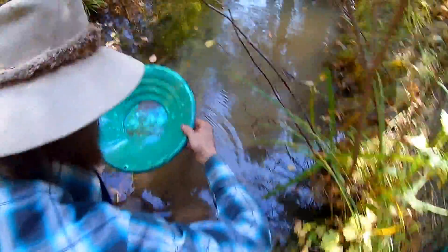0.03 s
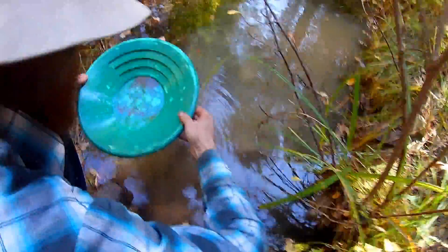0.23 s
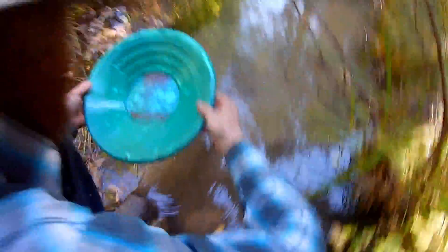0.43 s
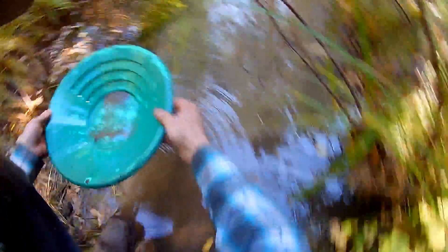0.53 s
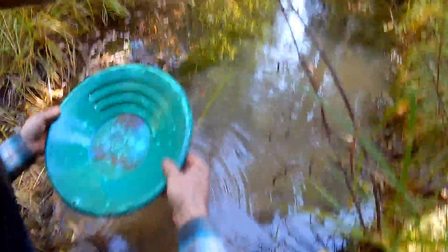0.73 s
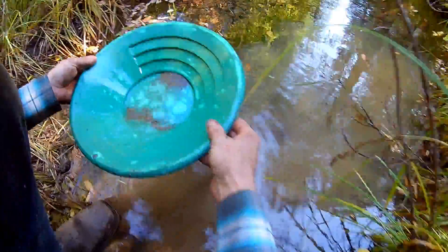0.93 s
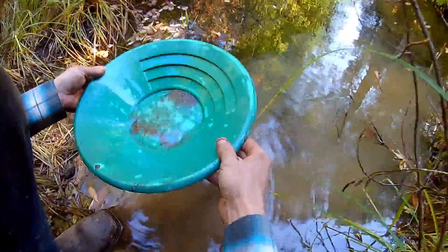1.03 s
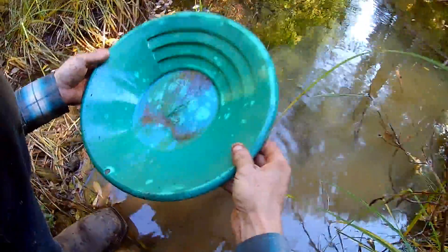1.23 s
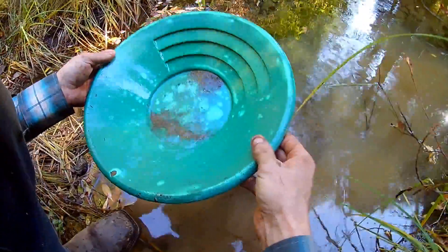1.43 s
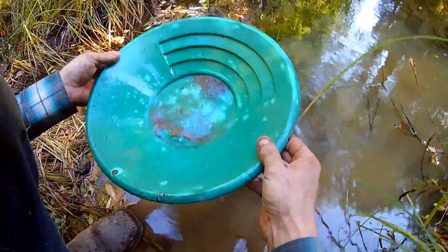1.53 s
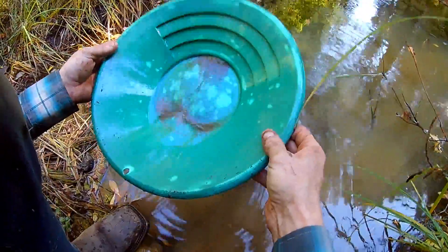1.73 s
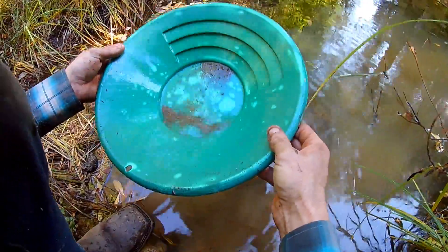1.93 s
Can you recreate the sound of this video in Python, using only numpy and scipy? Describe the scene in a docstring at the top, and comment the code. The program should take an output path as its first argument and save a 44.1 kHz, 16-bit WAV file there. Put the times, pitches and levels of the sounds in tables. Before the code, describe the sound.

Hollow knocks on a handled plastic gold pan, followed by small drips over soft creek water.

```python
"""A sleeve rustles close by, then a hollow plastic gold pan is bumped and knocked for about a second.
Soft bumps boom in its body, hard knocks clack and ring its wall, and sliding fingers make it buzz.
Then the pan is held still. Scattered drops, each a small ringing bubble, plink into the water
over the soft wash of a slow, muddy creek."""
import sys
import numpy as np
from scipy import signal
from scipy.fft import rfft, irfft
from scipy.io import wavfile

SR = 44100
rng = np.random.default_rng(int(sys.argv[2]) if len(sys.argv) > 2 else 0)


def put_to_file(sound):
    """Save the sound as 16-bit audio at rate SR, in the file named by the first command-line argument."""
    columns = np.atleast_2d(sound).T  # one column per channel
    safe = np.clip(columns, -1, 1)
    whole_steps = np.round(safe * 32767)
    wavfile.write(sys.argv[1], SR, whole_steps.astype(np.int16))


N = 88200
TIME = np.arange(N) / SR


# hard hits on the pan; tick and wall levels are relative to the clack:
# start_s, level_db, clack_hz, band_edge_ratio, tick_db, tick_top_hz, wall_db, wall_hz
HARD_KNOCKS = [(.3690, -20.5, 1265, 1.25, -6.5, 11700, -17, 672),
               (.3835, -49, 840, 1.25, -8, 4000, -13, 679), (.446, -41, 1550, 1.3, -15, 8000, -23, 709),
               (.485, -46.5, 2040, 1.15, -9, 8000, -25, 715), (0.6842, -39, 1330, 1.23, -4, 3020, -17, 643),
               (0.6959, -33.5, 1990, 1.63, -3, 8700, -22, 640),
               (0.7085, -34, 1620, 1.22, -13, 5000, -24, 616), (.7160, -41, 1480, 1.2, -15, 6500, -32, 610),
               (0.7252, -51, 1450, 1.4, -15, 5000, -23, 630), (.7400, -58, 1710, 0.92, -5, 6000, -10, 630),
               (0.7524, -36.5, 1190, 1.17, -6, 5200, -12.5, 626),
               (.8870, -36.5, 1475, 1.21, -2.5, 5700, -21, 766),
               (.9595, -53.5, 1370, 1.46, -24, 3600, -16, 640)]
# the wall's main note, a beating cluster: pitch_ratio, level_db, t60_s
WALL_CLUSTER = [(0.939, -4.5, 0.088), (1.009, 1.5, 0.12), (1.077, -5.5, 0.18)]
# the wall's higher modes: pitch_hz, level_db, t60_s
WALL_OVERTONES = [(1160, -15, 0.04), (1362, -6, 0.056), (1692, -7.5, 0.067), (2120, -17, 0.08),
                  (2832, -16.5, 0.11), (3510, -25, 0.33), (3810, -41, 0.11)]
# the bright tick on the attack: pitch_hz, level_db, t60_s
TICK_MODES = [(2780, 8, 0.0028), (3936, -0.5, 0.013), (5380, -0.5, 0.013), (5740, 0.5, 0.0073),
              (6870, -2.5, .005), (7460, 8.5, 0.0034), (13400, 6, 0.0017)]
GRIT_DB, GRIT_T60_S = -31, 0.095   # sand crushed in the contact, relative to the first click

def pan_knocks():
    """A hard contact gives a short clack, a bright gritty tick and a faint ring of the wall."""
    out, t = np.zeros(N), TIME[:N // 5]
    click = (t == 0) + 1e-18
    for start, db, clack_hz, edge_ratio, tick_db, tick_top_hz, wall_db, wall_hz in HARD_KNOCKS:
        edge_ratio = np.clip(edge_ratio, 1.1, 2)
        clack = filtered(click, 3, [clack_hz / edge_ratio, clack_hz * edge_ratio], "band")
        grit = click + rng.standard_normal(len(t)) * from_db(GRIT_DB - 60 * t / GRIT_T60_S)
        tick = signal.fftconvolve(grit, ring(TICK_MODES, t))[:len(t)]
        tick = filtered(tick, 4, tick_top_hz, "low")
        cluster = [(wall_hz * ratio, level, t60) for ratio, level, t60 in WALL_CLUSTER]
        overtones = [(hz, level + rng.normal(0, 2.6), t60) for hz, level, t60 in WALL_OVERTONES]
        wall = ring(cluster + overtones, t)
        knock = unit_peak(clack) + from_db(tick_db) * unit_peak(tick) + from_db(wall_db) * wall
        add(out, start, from_db(db) * knock)
    return out


# dull thumps on the pan: start_s, level_db, contact_ms, pitch_hz, decay_ratio, overtone_boost_db
SOFT_BUMPS = [(0.185, -52.5, 1.9, 123, 0.14, 3), (0.212, -53.5, 1.8, 113.4, 0.94, -3),
              (.228, -47.5, 6.4, 102, 0.3, -1.5), (0.253, -59.5, 3.3, 113, 1.56, 8),
              (.319, -44, 4.5, 111, 0.56, 1.5), (0.3714, -50.5, 3.6, 102.4, 0.7, 18),
              (0.4287, -33, 4.6, 104.8, 0.87, -4), (0.638, -47.5, 3.97, 114, 0.46, 2),
              (0.6858, -25, 2.2, 106, 0.45, -8.5), (0.705, -41, 2.9, 103.4, 1.8, -4),
              (0.74, -54, 3.1, 115, 0.43, 12), (0.753, -46, 5.1, 110.4, 2.33, 4),
              (0.826, -54.5, 2.7, 101.8, 1.3, 3), (0.889, -61, 2.2, 110.1, 0.84, 13.5),
              (.932, -55.5, 4.2, 114, 0.42, 5.5)]
# the hollow body, reshaped by each bump: pitch_ratio, base_level_db, base_t60_s
BODY_MODES = [(1.0, 7.5, 0.16), (1.5, 0, 0.039), (2.12, -2, 0.059), (2.6, 6.5, 0.1), (3.45, -7, 0.21)]
BASS_CUT_HZ = 123   # the small body radiates little below this

def pan_bumps():
    """A soft push sets the hollow body ringing; the grip shifts its pitch and damping."""
    out, t = np.zeros(N), TIME[:N // 3]
    for start, db, contact_ms, hz, decay_ratio, boost_db in SOFT_BUMPS:
        contact_progress = np.minimum(t[:SR // 50] * 1000 / contact_ms, 1)
        push = np.sin(np.pi * contact_progress) ** 2
        modes = [(hz * ratio, level + boost_db * (ratio > 1), t60 * decay_ratio)
                 for ratio, level, t60 in BODY_MODES]
        add(out, start, from_db(db) * signal.fftconvolve(ring(modes, t), push / push.sum()))
    return filtered(out, 3, BASS_CUT_HZ, "high")


# drips and small plops, spray relative to the bubble: start_s, level_db, pitch_hz, t60_s, spray_db
DRIPS = [(0.039, -47.5, 3620, 0.019, -8), (.054, -42.5, 2680, 0.011, -11), (.063, -44.5, 1786, 0.029, -11),
         (.088, -48, 2550, 0.011, -13), (.3412, -40, 2480, 0.0057, -9), (0.348, -40, 1930, 0.0069, -2),
         (.982, -52.5, 520, 0.024, -18), (1.081, -40, 884, 0.014, -18), (1.2391, -46, 2840, 0.0089, -3),
         (1.249, -52.5, 3050, 0.034, -10), (1.301, -49, 790, 0.012, -7), (1.4237, -44.5, 2820, 0.03, -18),
         (1.434, -54, 1630, 0.028, -8), (1.444, -56, 3100, 0.029, -7), (1.5295, -42, 545, 0.0092, -23),
         (1.541, -52, 1920, 0.023, -13), (1.791, -54.5, 1870, 0.048, -20), (1.977, -48, 2596, 0.041, -20)]
DROP_RISE_PER_S, DROP_ATTACK_CYCLES, SPRAY_T60_S = 0.82, 0.22, 0.015
DROP_TOP_HZ = 3670   # water softens the top of each drop

def water_drops():
    """Each drop traps a bubble that rings and rises a little, with a short spray around its pitch."""
    out, t = np.zeros(N), TIME[:N // 16]
    for start, db, hz, t60, spray_db in DRIPS:
        phase = 2 * np.pi * hz * t * (1 + DROP_RISE_PER_S * t / 2)
        bubble = np.sin(phase) * from_db(-60 * t / t60)
        hiss = filtered(rng.standard_normal(len(t)), 2, [hz * 0.6, hz * 1.4], "band")
        spray = unit_rms(hiss) * from_db(spray_db - 60 * t / SPRAY_T60_S)
        attack = 1 - np.exp(-t * hz / DROP_ATTACK_CYCLES)
        add(out, start, from_db(db) * attack * (bubble + spray))
    return filtered(out, 4, DROP_TOP_HZ, "low")


# midrange sleeve rubs: start_s, length_s, level_db
SLEEVE_RUBS = [(.002, 0.037, -59.5), (.184, 0.032, -54.5), (.212, .03, -52.5), (.315, 0.019, -59.5),
               (.428, 0.063, -65.5), (1.0, 0.031, -69.5)]
# tone of a rub: frequency_hz, gain_db
RUB_EQ = [(200, -24), (700, 1), (1200, -3), (1900, 8.5), (2700, 2), (3300, 3.5), (4400, -21.5),
          (6000, -17.5), (8000, -23), (11000, -25), (16000, -53)]
# bright shirt swishes: start_s, length_s, level_db
SHIRT_SWISHES = [(.075, 0.016, -64.5), (.188, 0.016, -60), (.43, 0.0078, -60.5), (.472, 0.026, -63.5),
                 (.985, 0.029, -73)]
# tone of a swish: frequency_hz, gain_db
SWISH_EQ = [(1500, -5), (3400, 16.5), (4700, -0.5), (5600, -5), (8000, 4.5), (10500, -10), (12500, -22),
            (15500, -27)]

def cloth_rustle():
    """Sleeve and shirt rub and swish as the arms move."""
    rubs = friction(SLEEVE_RUBS, RUB_EQ, spread_db=3.5)
    swishes = friction(SHIRT_SWISHES, SWISH_EQ, spread_db=2.0)
    return rubs + swishes


# finger slides on the plastic: start_s, length_s, level_db
FINGER_SLIDES = [(.485, 0.0059, -61.5), (.515, 0.011, -59), (.709, 0.055, -53.5), (.775, 0.0814, -60),
                 (.888, 0.014, -54.5)]
# light finger brushes: start_s, length_s, level_db
FINGER_BRUSHES = [(.515, 0.023, -68.5), (.638, 0.07, -70), (.71, 0.013, -67), (.738, 0.034, -64.5),
                  (.86, 0.04, -70), (.931, 0.0037, -69.5)]
# peaky tone of the buzzing plastic: frequency_hz, gain_db
BUZZ_EQ = [(280, -4), (450, -14), (640, 12.5), (900, 0), (1400, 8.5), (2200, -5), (2900, 1), (3500, -33),
           (3950, -6), (4450, -9.5), (4900, -48), (5350, -9), (6100, -13), (6600, -40), (7800, -23),
           (8900, -40), (9700, -16.5), (10600, -22), (11400, -75), (16000, -53)]
BRUSH_LOW_HZ, BRUSH_CUT_DB = 3900, 40

def finger_buzz():
    """Sliding fingers make the plastic buzz; light brushes give only the treble of that buzz."""
    treble_eq = [(hz, db - BRUSH_CUT_DB * (hz < BRUSH_LOW_HZ)) for hz, db in BUZZ_EQ]
    slides = friction(FINGER_SLIDES, BUZZ_EQ, spread_db=1.0)
    brushes = friction(FINGER_BRUSHES, treble_eq, spread_db=1.0)
    return slides + brushes


STROKE_ATTACK_S, STROKE_RELEASE_S, SLIPS_PER_S = 0.00084, 0.0028, 1900
SPURTS_PER_S, SPURT_DB = 140, 2.5

def friction(strokes, eq, spread_db):
    """Rubbing catches and lets go: tiny slips in uneven spurts; strokes start fast, hold and die away."""
    envelope = np.zeros(N)
    for start, length, db in strokes:
        attack = np.clip((TIME - start) / STROKE_ATTACK_S, 0, 1)
        release = np.exp(-np.maximum(TIME - start - length, 0) / STROKE_RELEASE_S)
        envelope += from_db(db) * attack * release
    spurts = np.interp(TIME * SPURTS_PER_S, np.arange(N), rng.uniform(-1, 1, N))
    slips = equalised(grains(SLIPS_PER_S, spread_db), eq)
    return envelope * from_db(SPURT_DB * spurts) * slips


# fader ride of the crackle: time_s, level_db
CRACKLE_FADER = [(0, -66), (.07, -75.5), (.13, -75), (.21, -71.5), (.3, -73), (.4, -75), (.49, -71.5),
                 (.57, -80), (.72, -84), (1.1, -89)]
CRACKLES_PER_S, CRACKLE_T60_S, CRACKLE_LOW_HZ, CRACKLE_TOP_HZ = 370, 0.026, 1950, 6500

def dry_crackle():
    """Cloth and dry stems give many small snaps, each a tiny noise burst that dies at once."""
    decay = from_db(-60 * TIME[:N // 100] / CRACKLE_T60_S)
    triggers = np.abs(grains(CRACKLES_PER_S, spread_db=3.5))
    bursts = signal.fftconvolve(triggers, decay)[:N] * rng.standard_normal(N)
    snaps = filtered(bursts, 3, [CRACKLE_LOW_HZ, CRACKLE_TOP_HZ], "band")
    return fader(CRACKLE_FADER) * unit_rms(snaps)


# dark tone of the creek bed's wash: frequency_hz, gain_db
WASH_EQ = [(20, 2), (60, 2.5), (160, 4), (300, 0), (650, 1), (1200, -3.5), (1900, -2.5), (2500, -4.5),
           (3200, -7), (4300, -19), (6500, -23.5), (9500, -23), (12000, -30), (15500, -34)]
# fader ride of the wash: time_s, level_db
WASH_FADER = [(0, -56), (.15, -63), (.45, -58.5), (.6, -64.5), (1.02, -65), (1.35, -65.5), (1.65, -66.5),
              (1.78, -64), (2, -67)]
RIPPLES_PER_S, RIPPLE_DB, RIPPLE_T60_CYCLES = 170, -71, 65

def creek():
    """Slow water makes a smooth wash, with tiny bubbles ringing in the ripples."""
    wash = fader(WASH_FADER) * equalised(rng.standard_normal(N), WASH_EQ)
    pitches_hz = np.geomspace(1000, 3400, num=20)
    ripples = np.zeros(N)
    for hz in pitches_hz:
        triggers = grains(RIPPLES_PER_S / len(pitches_hz), spread_db=2.5)
        bubble = ring([(hz, 0, RIPPLE_T60_CYCLES / hz)], TIME[:N // 20])
        ripples += signal.fftconvolve(triggers, bubble)[:N]
    return wash + from_db(RIPPLE_DB) * unit_rms(ripples)


def ring(modes, t):
    """Struck modes, each a dying sine."""
    return sum(from_db(db - 60 * t / t60) * np.sin(2 * np.pi * hz * t) for hz, db, t60 in modes)


def grains(per_s, spread_db):
    """Random clicks of uneven size."""
    sizes = from_db(spread_db * np.minimum(rng.exponential(1, N), 4)) * rng.choice([-1, 1], N)
    return sizes * (rng.random(N) < per_s / SR)


def equalised(x, eq):
    """Shape x with an EQ curve, at unit rms."""
    hz, db = np.transpose(eq)
    bins_hz = np.maximum(np.fft.rfftfreq(N, 1 / SR), 1)
    gain = from_db(np.interp(np.log(bins_hz), np.log(hz), db))
    return unit_rms(irfft(rfft(x) * gain, N))


def filtered(x, order, cutoff_hz, kind):
    """Low-, high- or band-pass x."""
    return signal.sosfilt(signal.butter(order, cutoff_hz, kind, fs=SR, output="sos"), x)


def fader(points):
    """Gain that glides between points of time and level."""
    return from_db(np.interp(TIME, *np.transpose(points)))


def from_db(db):
    """Decibels to gain."""
    return 10 ** (np.asarray(db) / 20)


def unit_rms(x):
    """Scale to an rms of one."""
    return x / np.sqrt(np.mean(x ** 2) + 1e-20)


def unit_peak(x):
    """Scale to a peak of one."""
    return x / np.abs(x).max()


def add(out, start_s, x):
    """Mix x into out from start_s."""
    i = max(int(start_s * SR), 0)
    out[i:i + len(x)] += x[:max(N - i, 0)]


def scene():
    """Mono mix: handling close by, the water behind it."""
    handling = cloth_rustle() + finger_buzz() + pan_bumps() + pan_knocks() + dry_crackle()
    return (handling + water_drops() + creek())[None]


HIGH_CUT_HZ = 15700

def record(dry):
    """A steep high cut takes the air off the mix."""
    return signal.sosfilt(signal.ellip(10, 0.2, 70, HIGH_CUT_HZ, fs=SR, output="sos"), dry)


dry = scene()
out = record(dry)
put_to_file(out)
```